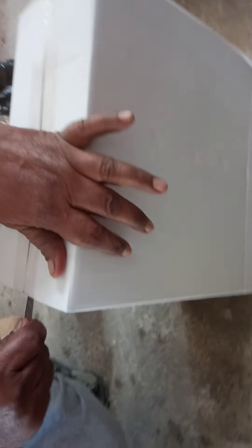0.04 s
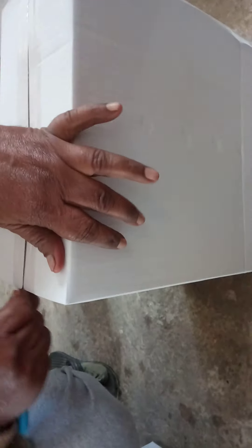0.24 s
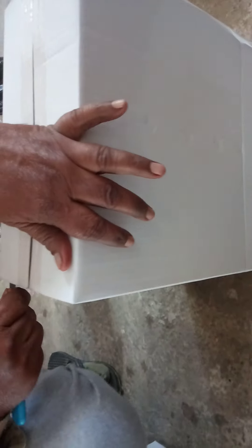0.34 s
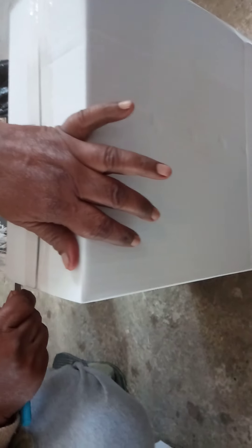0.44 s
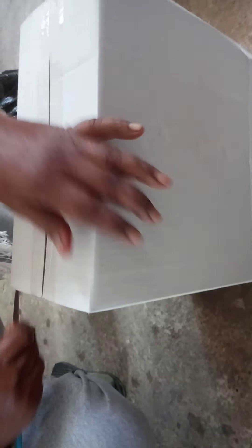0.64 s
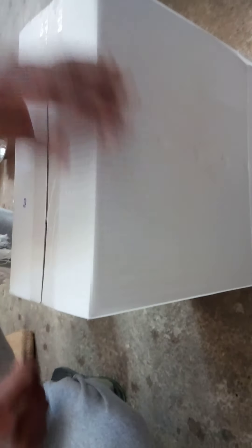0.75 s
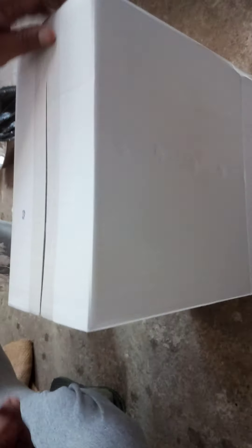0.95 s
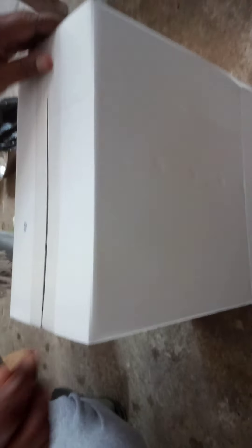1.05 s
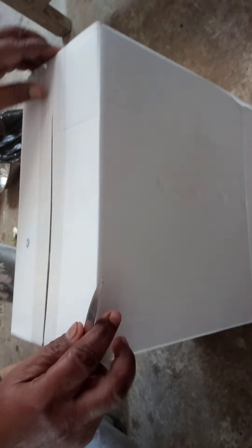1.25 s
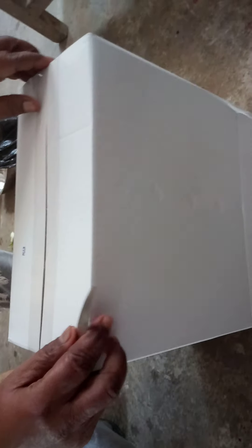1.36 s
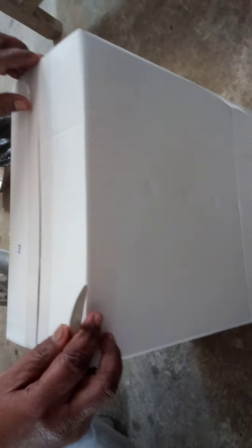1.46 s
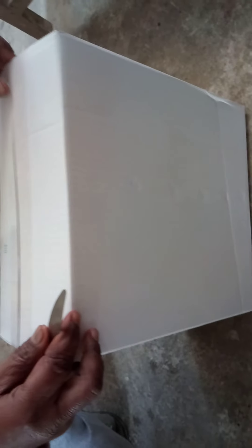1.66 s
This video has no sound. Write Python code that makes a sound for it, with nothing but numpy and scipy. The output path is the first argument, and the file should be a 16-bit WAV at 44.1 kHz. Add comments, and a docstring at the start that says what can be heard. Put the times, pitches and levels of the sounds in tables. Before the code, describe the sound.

A cardboard box scrapes and bumps on a concrete floor as hands shift it.

```python
"""Hands shift a cardboard box on a concrete floor in a bare, reverberant room with low background noise.
First fingers tap and rub the box, exciting its resonant modes. A sharp tick sounds as the drag begins
near 0.3 s; stick-slip friction makes the box scrape, groan and squeak until it bumps down at 0.76 s.
After a shift of grip a small blade slides with a faint hiss and gives two fainter ticks,
then knocks and rubs against the cardboard."""
import sys
import numpy as np
from scipy import signal
from scipy.io import wavfile

SR = 44100
rng = np.random.default_rng(int(sys.argv[2]) if len(sys.argv) > 2 else 0)


def generate_wav(signal):
    """Clip the signal to [-1, 1] and save it as 16-bit WAV at the path in sys.argv[1]."""
    frames = np.transpose(np.atleast_2d(signal))
    scaled = np.clip(frames, -1, 1) * 32767
    pcm = np.round(scaled).astype(np.int16)
    wavfile.write(sys.argv[1], SR, pcm)


N = 74970
TIME = np.arange(N) / SR


def amp(db):
    """Amplitude ratio: tenfold for every 20 dB."""
    return 10 ** (np.asarray(db) / 20)


def unit_energy(x):
    """Normalisation to an energy of one."""
    return x / np.sqrt(np.sum(x ** 2) + 1e-20)


def curve_at(points, hz):
    """Interpolation on a logarithmic frequency axis."""
    point_hz, value = np.transpose(points)
    return np.interp(np.log(hz + 1), np.log(point_hz + 1), value)


def add(mix, start_s, sound):
    """Superposition: a sound adds to the mix from its start time."""
    part = mix[max(round(start_s * SR), 0):][:len(sound)]
    part += sound[:len(part)]


def colour(x, spectrum, modes=(), size=16384):
    """Minimum-phase filtering at unit energy: Lorentzian resonances on a broad spectrum."""
    hz = abs(np.fft.fftfreq(size, 1 / SR))
    power = 1 + sum(amp(db) ** 2 / (1 + (2 * (hz - f) / width) ** 2) for f, width, db in modes)
    log_gain = np.log(amp(curve_at(spectrum, hz)) * np.sqrt(power))
    transfer = np.exp(np.conj(signal.hilbert(log_gain)))
    response = np.fft.ifft(transfer).real[:size // 2]
    return signal.fftconvolve(x, unit_energy(response))[:N]


def ring(t, hz, width_hz):
    """Damped resonance: the wider its band, the sooner it dies."""
    return t * np.exp(-np.pi * width_hz * t) * np.sin(2 * np.pi * hz * t)


def slips(per_s, spread_db):
    """Stick-slip friction as a Poisson process: impulses of uneven size, rms one."""
    size = amp(spread_db * np.minimum(rng.exponential(1, N), 4.5))
    direction = rng.choice([-1, 1], N)
    slipping = rng.random(N) < per_s / SR
    return np.sqrt(N) * unit_energy(size * direction * slipping)


# Background spectrum. Each row: frequency in Hz, relative density in dB.
BACKGROUND_SPECTRUM = [(20, 17), (45, -11), (65, 10), (100, 25.5), (200, -19), (500, 2), (1500, -22.5),
                       (4000, -35.5), (5400, -11), (6800, -70.5), (8000, -54), (15500, -25.5)]
def background(level_db=-64):
    """Stationary Gaussian noise, strongest in the bass."""
    return amp(level_db) * colour(rng.standard_normal(N), BACKGROUND_SPECTRUM)


# Decay of the room. Each row: frequency in Hz, reverberation time in seconds.
ROOM_T60 = [(60, 1.77), (200, 0.62), (450, 0.64), (900, 0.77), (2000, 0.64), (5000, 0.49), (14000, 0.42)]
def room(x, onset_s=0.0052):
    """Reverberation: dense reflections off concrete decay exponentially, the bass most slowly."""
    hz, t, bands = signal.stft(rng.standard_normal(SR), SR, nperseg=256)
    decay = amp(-60 * t / curve_at(ROOM_T60, hz)[:, None])
    tail = signal.istft(bands * decay, SR, nperseg=256)[1]
    tail *= np.clip(np.arange(len(tail)) / SR / onset_s - .5, 0, 1)
    return signal.fftconvolve(x, unit_energy(tail))[:N]


# Ticks of the blade. Each row: start in seconds, relative level in dB, lower and upper mode in Hz,
# level of the upper against the lower in dB, width of both in Hz.
BLADE_TICKS = [(.3197, -26, 6160, 12700, -11.5, 1900), (1.279, -39.5, 3670, 11280, -0.5, 910),
               (1.339, -48, 3450, 5240, -1, 500)]
def blade_ticks(scratch_t60_s=0.018):
    """Damped vibration: a brief scratch excites two modes of the metal."""
    out, t = np.zeros(N), TIME[:SR // 8]
    for start, db, low_hz, high_hz, high_db, width in BLADE_TICKS:
        scratch = rng.standard_normal(len(t)) * amp(-60 * t / scratch_t60_s)
        low = unit_energy(signal.fftconvolve(scratch, ring(t, low_hz, width)))
        high = unit_energy(signal.fftconvolve(scratch, ring(t, high_hz, width)))
        add(out, start, amp(db) * (low + amp(high_db) * high))
    return out


# Fibres squeak during the drag; later the sliding blade hisses faintly near 5.3 kHz.
# Each row: start and length in seconds, pitch in Hz, relative level in dB.
FRICTION_TONES = [(.345, 0.1, 1607, -41), (.385, .12, 916, -45.5), (0.389, 0.13, 1258, -48.5),
                  (.594, 0.049, 2295, -42), (.595, 0.048, 6340, -42), (.596, 0.065, 4105, -55),
                  (0.662, 0.072, 2706, -47), (.669, 0.039, 6280, -46), (0.692, .06, 4044, -48),
                  (1.181, 0.32, 5270, -77)]
def friction_tones(relative_width=0.033, swell_skew=0.43):
    """Narrow-band resonance: friction noise drives one mode into a raspy tone that swells and fades."""
    out = np.zeros(N)
    for start, length, hz, db in FRICTION_TONES:
        t = TIME[TIME < length]
        mode = ring(TIME[:SR // 10], hz, relative_width * hz)
        tone = signal.fftconvolve(rng.standard_normal(SR // 2), mode, "valid")[:len(t)]
        swell = np.sin(np.pi * (t / length) ** swell_skew)  # a skew under one peaks early
        add(out, start, amp(db) * np.sqrt(len(t)) * unit_energy(tone) * swell)
    return out


# Modes of the box. Each row: frequency in Hz, width in Hz, height over the plain board in dB.
BOX_MODES = [(207.5, 6.3, 0.5), (321.5, 20, -1), (323.7, 7.7, 12.5), (596, 5.3, -24), (678.4, 7.6, 5.5),
             (791, 4, 10), (898, 7.6, 5), (1084, 35, 2), (1242.5, 12.4, 5), (1531, 15, 0.5),
             (1615, 14, 1.5), (2288, 56, 5), (2663, 23, 0.5), (3516, 82, 3), (4070, 106, 2.5),
             (5230, 19, -3), (6320, 143, 4)]
def box_response(force, spectrum, ring_db=0):
    """Forced vibration: a force sounds through the box's modes, their heights raised by ring_db."""
    return colour(force, spectrum, [(hz, width, db + ring_db) for hz, width, db in BOX_MODES])


# Drive from the dragged edge. Each row: time in seconds, relative level in dB.
SINGING_DRIVE = [(0.329, -55), (.365, -47.5), (.43, -54.5), (.47, -55), (.54, -58), (0.599, -39.5),
                 (.64, -51), (.69, -44.5), (0.731, -44.5), (.77, -76)]
# Spectrum of the singing. Each row: frequency in Hz, relative density in dB.
SINGING_SPECTRUM = [(250, -42), (600, -8.5), (900, -0.5), (1600, 9), (2400, -6.5), (4100, -14), (5400, -15),
                    (7000, -23), (9000, -48)]
def singing_panels(level_db=-2):
    """Resonant selection: of the broad noise of fine slips, the panels pass mainly their own modes."""
    times, db = np.transpose(SINGING_DRIVE)
    dragging = (TIME > times[0]) * (TIME < times[-1])
    drive = slips(per_s=2500, spread_db=0.5) * amp(np.interp(TIME, times, db)) * dragging
    return amp(level_db) * box_response(drive, SINGING_SPECTRUM, ring_db=14)


# Chatter of the drag. Each row: time in seconds, slips per second, relative level in dB.
CHATTER = [(.325, 192.6, -52), (.355, 199, -30), (0.397, 202, -27), (0.416, 206, -31), (0.439, 208, -48),
           (0.483, 208, -43), (.535, 213, -59), (.576, 233, -30), (0.603, 260, -37.5), (0.652, 206, -41.5),
           (0.691, 212, -56.5), (0.743, 204, -38)]
# Spectrum of the chatter. Each row: frequency in Hz, relative density in dB.
CHATTER_SPECTRUM = [(60, -36), (140, -15), (200, 6.5), (270, 1), (330, 6), (420, -13.5), (620, -10.5),
                    (820, -13.5), (1250, -23.5), (1600, -5), (2400, -47.5), (6000, -39), (15000, -65)]
def chatter(level_db=-2, jitter_cycles=0.039, spread_db=3.2):
    """Relaxation oscillation: nearly periodic sticking and slipping makes the box groan."""
    times, rate, db = np.transpose(CHATTER)
    dragging = (TIME > times[0]) * (TIME < times[-1])
    cycles = np.cumsum(np.interp(TIME, times, rate) * dragging) / SR
    force = np.zeros(N)
    for k, (late, size) in enumerate(rng.standard_normal((int(cycles[-1]) - 1, 2))):
        at = np.interp(k + 1 + jitter_cycles * late, cycles, TIME)
        period_samples = SR / np.interp(at, times, rate)
        push = amp(np.interp(at, times, db) + spread_db * size) * np.sqrt(period_samples)
        add(force, at, np.array([push]))
    return amp(level_db) * box_response(force, CHATTER_SPECTRUM)


# Fingers tapping and grit catching. Each row: start in seconds, relative levels of body and snap
# in dB, time to fall 60 dB in seconds, pitch of the struck panel in Hz.
TAPS = [(.0685, -29.5, -34, 0.09, 920), (0.0711, -22.5, -68, 0.054, 770),
        (.1412, -26.5, -35.5, 0.034, 1730), (.161, -42, -55, 0.026, 1090), (.2109, -74, -42.5, 0.045, 1800),
        (.267, -69, -50, 0.018, 1800), (.307, -29.5, -46, 0.033, 670), (.3511, -31, -29.5, 0.13, 644),
        (0.3591, -25.5, -31, 0.023, 1580), (.3875, -30.5, -24, 0.18, 1600), (.5048, -40, -38, 0.06, 910),
        (.5501, -29, -34.5, 0.084, 1600), (.596, -26.5, -25, 0.045, 2480), (.6705, -35, -28, 0.08, 2300),
        (.756, -25, -38, 0.056, 1500), (.764, -21, -44, 0.055, 370), (.829, -48, -41.5, 0.045, 750),
        (1.376, -38, -48.5, 0.049, 554), (1.4032, -60, -49, 0.0091, 1845), (1.4847, -46, -43, .035, 980),
        (1.505, -51, -54, .012, 1100), (1.518, -44.5, -54, 0.01, 1010), (1.5723, -60, -48.5, 0.0076, 1800)]
# Spectra of a tap's body and of the paper surface. Each row: frequency in Hz, relative density in dB.
TAP_SPECTRUM = [(50, -3), (200, 9), (450, 4), (750, 1.5), (1100, -1.5), (1500, -7), (2300, 0),
                (3500, -12.5), (8000, -55.5)]
PAPER_SPECTRUM = [(900, -33), (1600, 6), (2300, 6.5), (3200, 1.5), (4100, 2.5), (5000, 2), (6500, -1),
                  (7000, -5), (7700, -14.5), (11500, -22.5), (15500, -32)]
def taps(level_db=15, crack_share=0.16, panel_relative_width=0.15, panel_db=14.5):
    """Impact excitation: a crack and a crumbling burst ring the box and the struck panel."""
    body, snap, t = np.zeros(N), np.zeros(N), TIME[:SR // 8]
    for start, body_db, snap_db, t60, hz in TAPS:
        crumble = unit_energy(rng.standard_normal(len(t)) * amp(-60 * t / t60))
        burst = np.sqrt(1 - crack_share) * crumble
        burst[0] += np.sqrt(crack_share)
        modes = BOX_MODES + [(hz, hz * panel_relative_width, panel_db)]
        add(body, start, -amp(body_db) * colour(burst, TAP_SPECTRUM, modes, size=8192))
        add(snap, start, -amp(snap_db) * burst)
    return amp(level_db) * (body + box_response(snap, PAPER_SPECTRUM))


# Bumps and knocks. Each row: start in seconds, relative level in dB, contact time in seconds.
BUMPS = [(0.073, -24, 0.0042), (.316, -34.5, 0.0014), (0.349, -36, 0.0024), (0.491, -17.5, 0.014),
         (.756, -14.5, 0.0028), (0.764, -12, 0.0027), (.7745, -12, 0.0015), (0.826, -28.5, 0.0016),
         (0.861, -32, 0.021), (1.001, -46, 0.012), (1.1, -28, 0.0083), (1.381, -28.5, 0.0011),
         (1.396, -29, 0.0025), (1.407, -32, 0.0026), (1.488, -34, 0.00067)]
# Spectrum of the thud. Each row: frequency in Hz, relative density in dB.
THUD_SPECTRUM = [(25, -35.5), (65, -6.5), (100, -7.5), (150, 2), (185, 3), (250, -1.5), (340, -1),
                 (450, -14), (900, -13), (3000, -38.5)]
def bumps(level_db=-2):
    """Soft impact: the longer the force pulse, the duller the thud of the whole box."""
    force, t = np.zeros(N), TIME[:SR // 20]
    for start, db, contact_s in BUMPS:
        progress = 5 * t / contact_s
        add(force, start, amp(db + level_db) * unit_energy(progress * np.exp(-progress)))
    return box_response(force, THUD_SPECTRUM)


# Rubbing strokes. Each row: time in seconds, then relative levels of boom, rasp and hiss in dB.
HAND_RUB = [(0, -64, -64.5, -60.5), (.05, -55, -56, -59.5), (.12, -48.5, -51, -64.5),
            (.165, -42, -47.5, -53), (.21, -66, -75, -63.5), (.27, -76, -80, -55)]
SLIDE = [(0.272, -47, -58.5, -59), (0.299, -66, -47.5, -55), (.314, -33.5, -47.5, -68),
         (0.332, -40.5, -44.5, -53), (0.356, -30, -36.5, -44.5), (0.409, -35.5, -41, -46.5),
         (0.469, -43, -48, -53.5), (.5, -40.5, -48.5, -52), (0.538, -46.5, -50, -52.5),
         (.59, -43.5, -53.5, -41.5), (0.601, -59, -46.5, -40.5), (.652, -40, -44.5, -47.5),
         (.678, -40, -47.5, -46), (0.716, -54.5, -52, -43.5), (0.751, -32.5, -43, -47)]
SETTLE = [(.75, -29.5, -44, -46), (.79, -45, -47.5, -53), (0.829, -47, -51.5, -55.5),
          (0.881, -52, -67.5, -87), (.96, -57, -91, -103), (1.051, -52, -59, -69.5)]
REGRIP = [(1.062, -60.5, -72, -76), (1.1, -58, -55.5, -61.5), (1.149, -59, -73.5, -70.5),
          (1.201, -80, -81, -73.5), (1.261, -72, -68, -72.5), (1.362, -100, -96, -73)]
BLADE_RUB = [(1.368, -54.5, -57, -64), (1.41, -52.5, -65.5, -70.5), (1.47, -58, -73, -69.5),
             (1.493, -46, -58, -67.5), (1.58, -54, -60.5, -59.5), (1.631, -48.5, -52, -53.5),
             (1.654, -63, -56.5, -57), (1.7, -90, -81, -63)]
def stroke_envelope(column, fade_s=0.0079):
    """Incoherent addition: the strokes sum in power to give the amplitude of one part of the rubbing."""
    power = np.zeros(N)
    for stroke in (HAND_RUB, SLIDE, SETTLE, REGRIP, BLADE_RUB):
        times, db = np.transpose(stroke)[[0, column]]
        inside_s = np.minimum(TIME - times[0], times[-1] - TIME)
        fade = np.clip(.5 + inside_s / (2 * fade_s), 0, 1)
        power += amp(np.interp(TIME, times, db)) ** 2 * fade
    return np.sqrt(power)


# Spectra of the hollow boom and the panel rasp. Each row: frequency in Hz, relative density in dB.
BOOM_SPECTRUM = [(30, -27.5), (65, -2), (100, -14), (150, -3), (200, 0.5), (260, -6), (330, -8), (430, -11),
                 (600, -31), (1500, -66)]
RASP_SPECTRUM = [(200, -33.5), (450, -0.5), (700, 3.5), (1050, -5), (1350, -2), (1600, -1.5), (1950, -11),
                 (2400, -20.5), (3300, -18), (8000, -69)]
def rubbing(hiss_db=-1):
    """Sliding friction: random slips shake the hollow box, its panels and its paper surface."""
    boom = box_response(slips(per_s=900, spread_db=2.24) * stroke_envelope(column=1), BOOM_SPECTRUM)
    rasp = box_response(slips(per_s=2500, spread_db=3.4) * stroke_envelope(column=2), RASP_SPECTRUM)
    hiss = box_response(slips(per_s=4500, spread_db=1.34) * stroke_envelope(column=3), PAPER_SPECTRUM)
    return boom + rasp + amp(hiss_db) * hiss


def scene(direct_db=-2, room_db=-10, blade_send_db=-6):
    """Direct and reverberant fields add to the background; the blade is close, so its ticks are drier."""
    box = rubbing() + chatter() + singing_panels() + friction_tones() + taps() + bumps()
    blade = blade_ticks()
    direct = amp(direct_db) * (box + blade)
    reverberant = amp(room_db) * room(box + amp(blade_send_db) * blade)
    return (background() + reverberant + direct)[None]


def record(dry, cutoff_hz=15800):
    """Band limiting by a steep linear-phase low-pass filter."""
    lowpass = signal.firwin(511, cutoff_hz, window=("kaiser", 9), fs=SR)
    return signal.oaconvolve(dry, lowpass[None], "same")


dry = scene()
out = record(dry)
generate_wav(out)
```